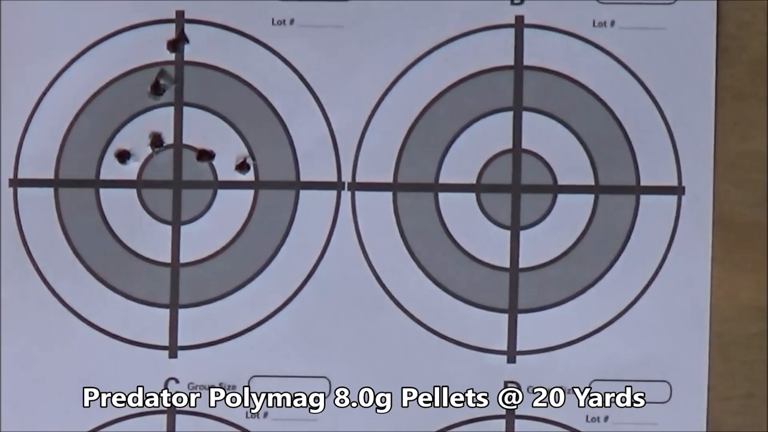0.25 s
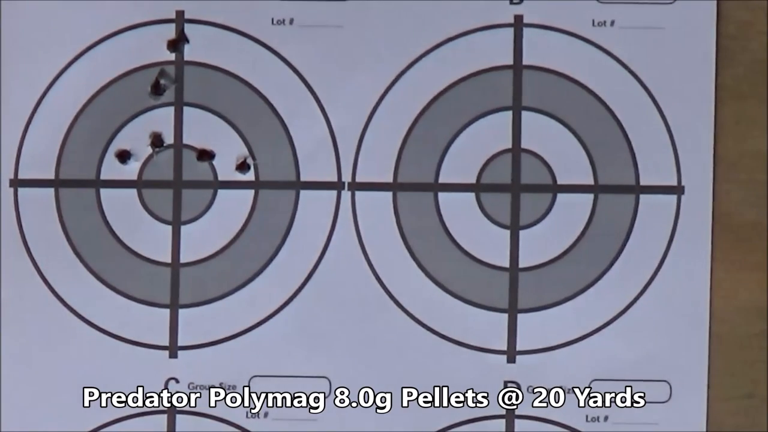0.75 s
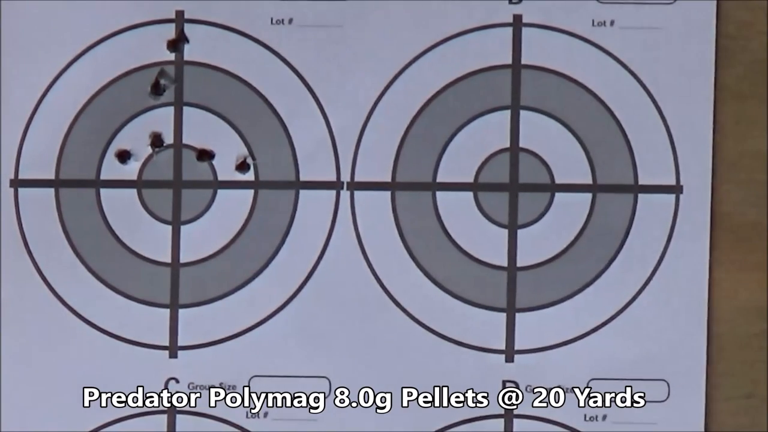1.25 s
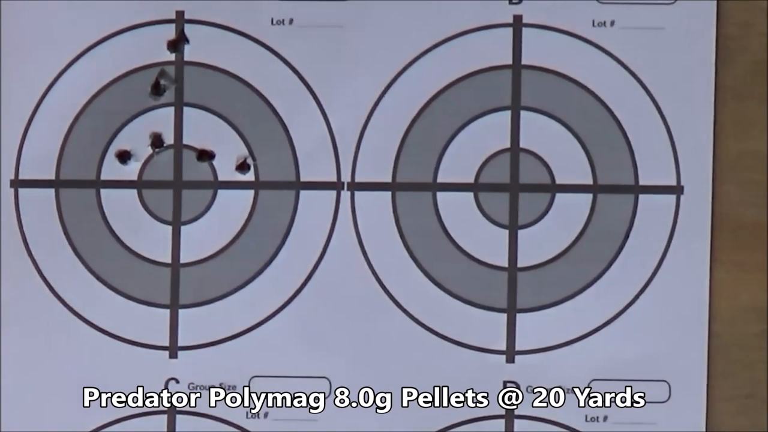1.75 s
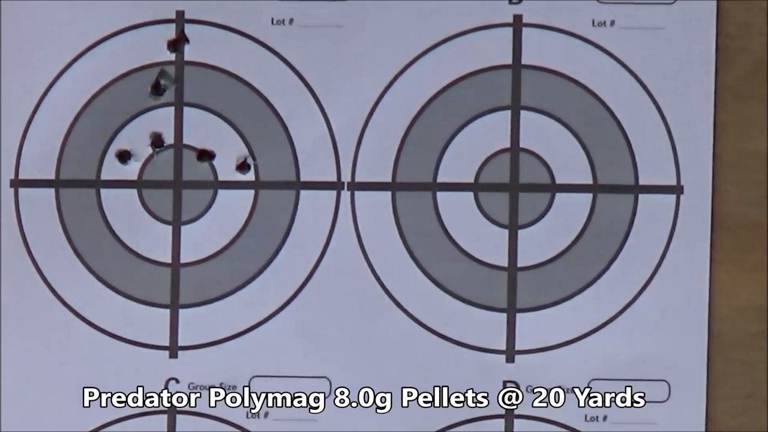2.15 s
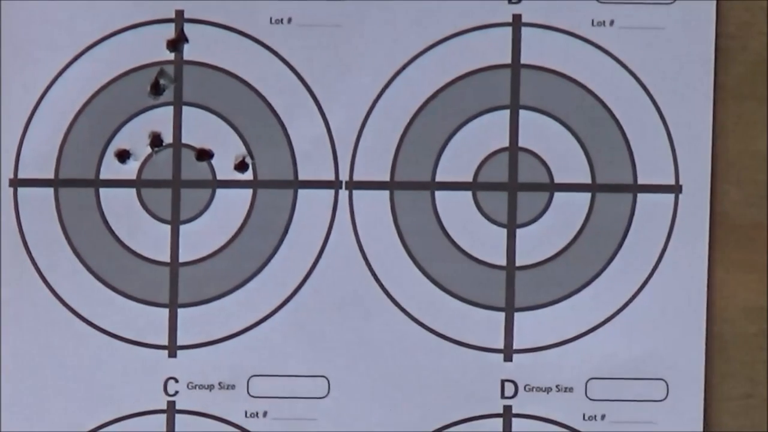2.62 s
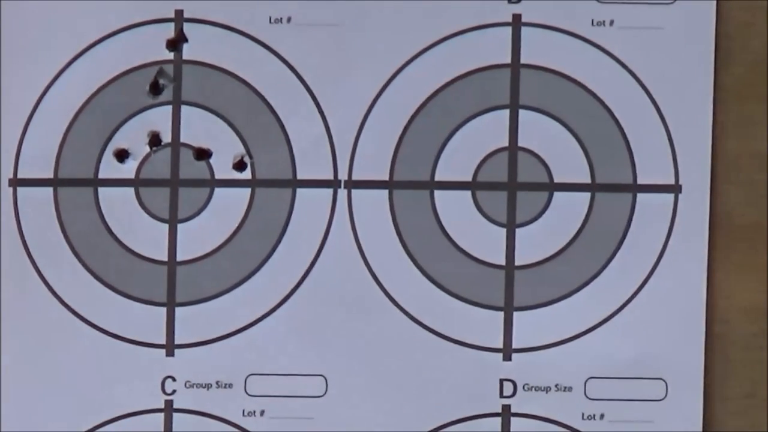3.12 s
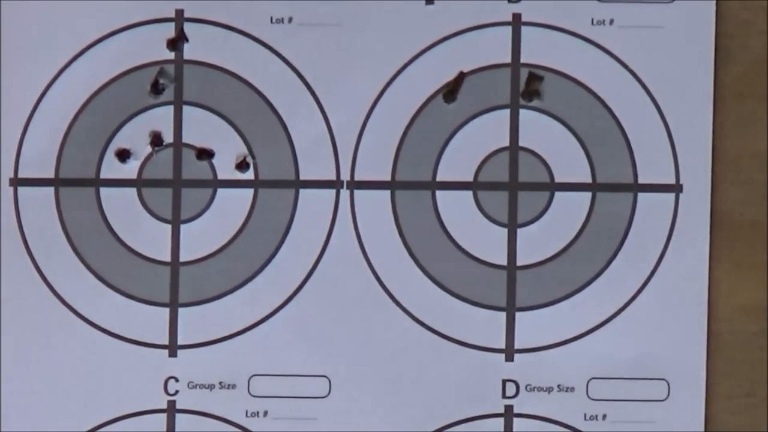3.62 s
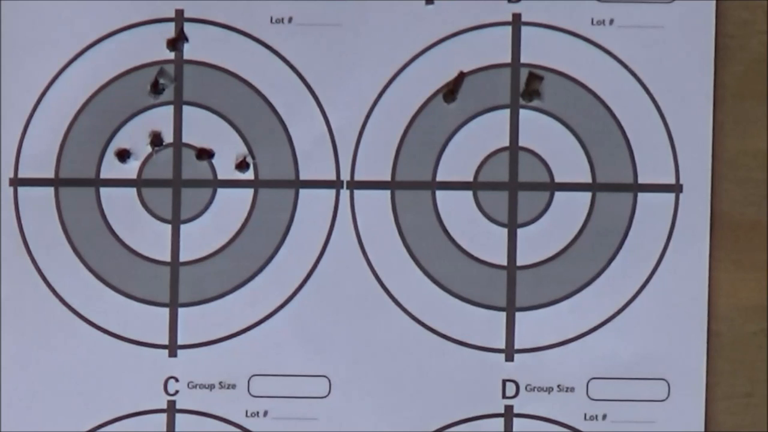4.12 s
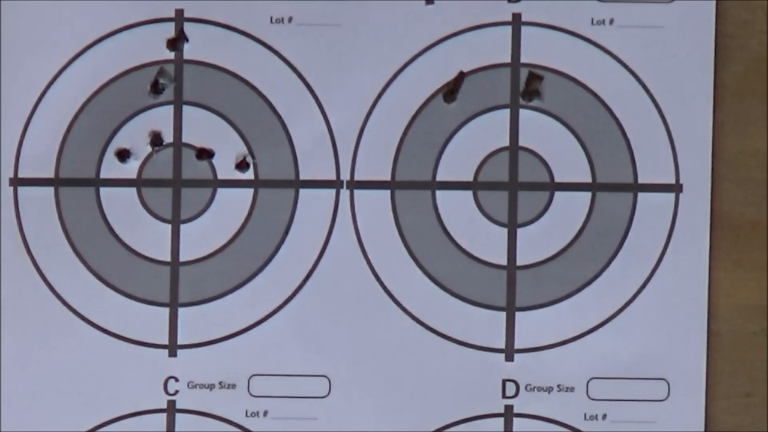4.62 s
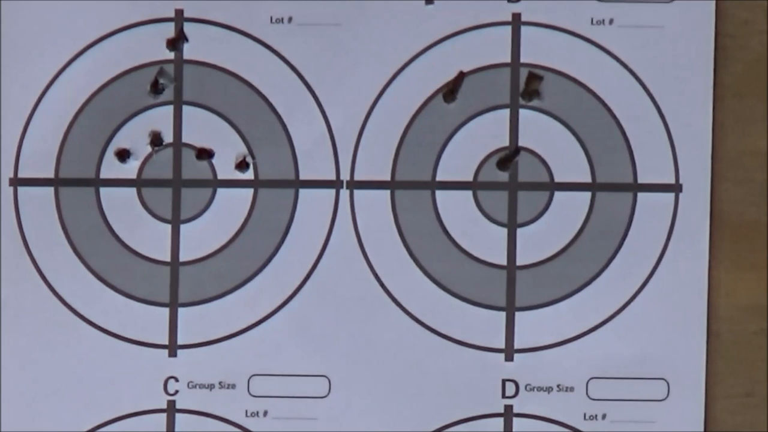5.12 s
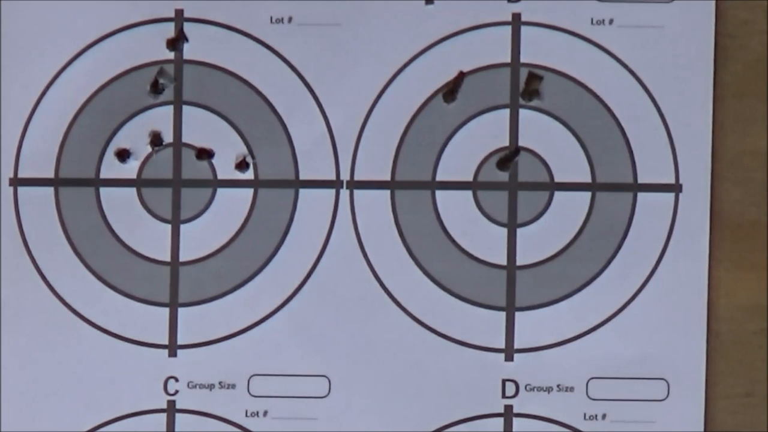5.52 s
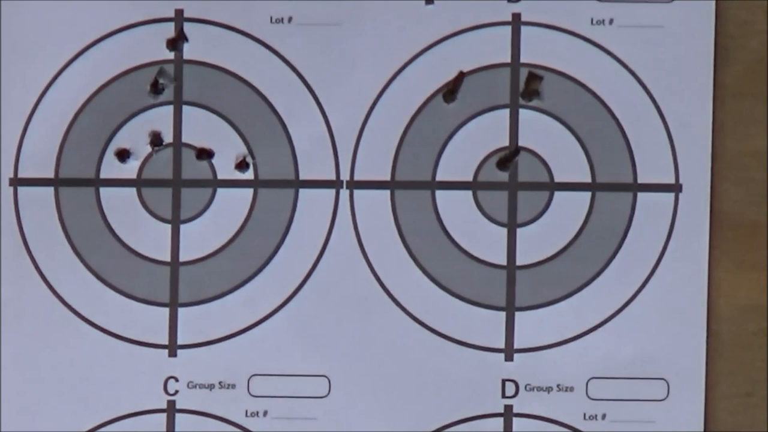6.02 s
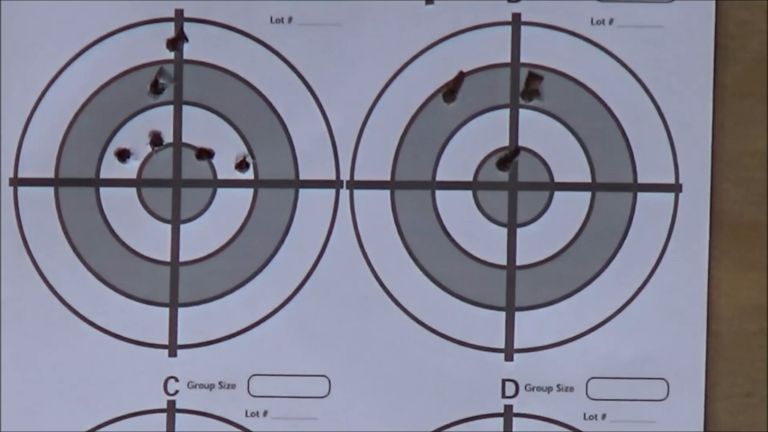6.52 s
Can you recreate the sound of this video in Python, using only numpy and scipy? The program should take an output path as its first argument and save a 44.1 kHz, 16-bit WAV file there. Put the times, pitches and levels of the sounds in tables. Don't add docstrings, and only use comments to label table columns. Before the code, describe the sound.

Gusty wind roars through trees at an outdoor range, abruptly drops to a calm hush, then a spring air rifle cracks and its pellet smacks paper.

```python
import sys
import numpy as np
from scipy import signal
from scipy.io import wavfile
from scipy.ndimage import uniform_filter1d

SR = 44100
rng = np.random.default_rng(int(sys.argv[2]) if len(sys.argv) > 2 else 0)


def nominal_scale(level):
    x = np.asarray(level, float) / 20
    return 10 ** x


def transcribe(u):
    v = np.clip(np.atleast_2d(u).T, -1, 1)
    q = np.round(v * 32767).astype(np.int16)
    wavfile.write(sys.argv[1], SR, q)


N = 298102
T = np.arange(N) / SR
CUT_S = 3.2315

# [t/s, peak level/dB, length/s, low ring f/Hz, low ring level/dB]
CRACKS = [
    (4.7694, 1, .0014, 1900, -2),
    (4.8409, -1.5, .0010, 4600, 0),
]
# [f/Hz, width/Hz, level/dB]
CAPSULE_RINGS = [(6200, 1600, -1), (7600, 1200, -6), (10100, 1800, 2), (12400, 2000, -7)]
# (start t/s, top t/s, level/dB, f/Hz, low f/Hz, low level/dB)
RATTLE = (4.7595, 4.7652, -35, 8400, 2600, -5)
# [arrival t/s, top level/dB, rise/s, fall/(dB/s)]
RETURNS = [
    (4.7695, -19.5, 0.0012, 200),
    (4.806, -24.5, 0.021, 330),
    (4.835, -28, 0.043, 67.5),
    (4.91, -39.5, 0.031, 70),
]
# [arrival t/s, top level/dB, rise/s, fall/(dB/s)]
THUMPS = [
    (4.7695, -33.5, 0.013, 400),
    (4.81, -39.5, 0.047, 78),
]
# [f/Hz, level/dB per Hz]
MUZZLE_COLOUR = [(240, -32), (400, -3), (654, -8), (739, -19), (1050, -8), (1150, -17), (1640, -4),
                 (3820, -11), (5200, -8), (5880, -5), (8630, -8.5), (9750, -1), (10700, -8.5), (12900, -11),
                 (15700, -25)]
# [f/Hz, level/dB per Hz]
STRIKE_COLOUR = [(530, -35), (900, 7), (1190, -17), (1320, 0), (1520, -7.5), (2340, -5), (3120, -5),
                 (5820, 2), (8330, -2), (9390, 2.5), (15700, -18)]
# [f/Hz, level/dB per Hz]
FAR_COLOUR = [(410, -45), (700, -9), (808, -6), (1020, -6), (1290, -2), (1860, 1), (2200, -8.5), (3560, -4),
              (5620, -0.5), (9960, -6.5), (14500, -22), (15700, -30)]
# [f/Hz, level/dB per Hz]
THUMP_COLOUR = [(88, -49), (150, -28), (220, 7), (465, 0), (507, -14), (588, -11), (731, -6), (1200, -18.5),
                (1560, -44), (2640, -120)]
# [f/Hz, likeness 0..1]
ECHO_LIKENESS = [(150, .98), (380, 0.96), (950, 0.52), (2380, .35), (5980, 0.59), (9500, 0.87),
                 (11500, 0.94)]
# [t/s, peak level/dB, f/Hz, ring time to -60 dB/s, left-right level/dB]
SLAPS = [(4.780, -21, 1700, .012, 0), (4.792, -19, 9700, .012, 0), (4.807, -26, 300, .06, 0),
         (4.8185, -19, 6050, .05, 0), (4.8258, -18, 6000, .02, 0), (4.8895, -23, 760, .014, 0),
         (4.888, -29, 330, .05, 0), (4.943, -28, 4200, .012, 0), (4.951, -25, 4200, .012, 0),
         (4.961, -33, 1600, .015, 0), (5.026, -34, 3000, .008, 6), (5.068, -29, 3100, .006, -5),
         (5.0683, -30, 9500, .004, -3), (5.0683, -33, 6000, .003, -3), (5.0997, -19, 3200, .004, 8),
         (5.1008, -27, 1750, .01, 6), (5.109, -34, 7800, .006, 0), (5.122, -35, 3100, .006, 2),
         (5.153, -39, 1900, .01, -6), (5.165, -40, 2100, .008, -3), (5.1789, -25.5, 2800, .005, 5),
         (5.1793, -32, 1900, .007, 3)]
# [t/s, length/s, level/dB, lower f/Hz, upper f/Hz]
CAWS = [
    (3.473, .11, -57, 1250, 1360),
    (4.249, 0.15, -59, 1250, 1420),
]
# (start t/s, rise/s, hold/s, fade/s, level/dB)
ENGINE = (4.18, .12, .5, .1, -49.5)
# [t/s, gust level/dB]
GUSTS = [(0, -2.5), (.3, -3), (.9, -1), (1.4, 1.5), (1.75, 3), (2.1, 0), (2.35, 1.5), (2.6, -0.5),
         (3.07, 0.5), (3.23, -1), (3.24, 2), (3.45, -1), (3.7, 1), (3.95, -2.5), (4.25, 1), (4.8, 0),
         (6.5, 0), (6.76, 2.5)]
# (rumble level/dB, roar level/dB, rustle level/dB)
GUSTY_LEVELS = (-44.5, -39, -37)
# (rumble level/dB, roar level/dB, rustle level/dB)
CALM_LEVELS = (-50.5, -52, -56.5)
# (rumble, roar, rustle) [dB per dB]
GUST_SHARES = (1.13, .35, 0.3)
# [f/Hz, level/dB per Hz]
GUSTY_LOW = [(12, -44), (20, -49), (80, 0), (102, 1.5), (288, -4), (361, -0.5), (433, -4.5), (499, -2.5),
             (736, -3), (2600, -8), (3380, -42), (5720, -120)]
# [f/Hz, level/dB per Hz]
GUSTY_HIGH = [(710, -30), (1200, -0.5), (1460, -2), (1730, -1.5), (2470, -5), (3410, -4.5), (5410, -3.5),
              (8410, -8), (9780, -6.5), (14400, -21), (15700, -30)]
# [f/Hz, level/dB per Hz]
CALM_LOW = [(12, -58), (20, -28), (42, -24.5), (96, 2), (192, -10), (288, -15.5), (383, -19.5), (553, -20),
            (600, -20), (1040, -21), (1170, -25), (2600, -26.5), (3380, -64), (5720, -120)]
# [f/Hz, level/dB per Hz]
CALM_HIGH = [(710, -31), (1200, 2.5), (1430, -3.5), (1600, -7.5), (1730, -4.5), (1890, -10), (3300, -9.5),
             (3710, -11.5), (4560, -9), (8230, -15.5), (9670, -15.5), (15700, -29.5)]
# [f/Hz, likeness 0..1]
WIND_LIKENESS = [(60, .995), (150, .992), (380, .94), (950, .76), (2380, .62), (5980, .67), (9000, .8),
                 (10300, .9), (11600, .999)]
# [f/Hz, left-right level/dB]
LEAN = [(200, 0), (600, -.9), (1500, -.9), (3000, 0), (5500, .6), (11000, 0)]
# [t/s, depth/dB, recovery/s]
DUCKS = [
    (4.7665, 15, .011),
    (4.8383, 14, .009),
    (4.87, 7, 4.0),
]


def evened(x):
    return x / np.sqrt(np.mean(x ** 2) + 1e-20)


def read(points, hz):
    f, value = np.transpose(points)
    return np.interp(np.log(hz + 1), np.log(f + 1), value)


def add(mix, s, sound):
    part = mix[..., round(s * SR):][..., :sound.shape[-1]]
    part += sound[..., :part.shape[-1]]


def resonate(x, hz, width_hz):
    turn = np.exp(2j * np.pi * np.cumsum(hz * np.ones(x.shape[-1])) / SR)
    r = np.exp(-np.pi * width_hz / SR)
    return 2 * (turn * signal.lfilter([1 - r], [1, -r], x / turn)).real


def noise(count, size, colour_db, likeness, patchy_db, flicker_db, lead=-0.23):
    frames = 4 * count // size + 6
    hz = np.fft.rfftfreq(size, 1 / SR)[:, None]
    a, b, c, d, patches = rng.standard_normal((frames, len(hz), 5)).T
    patches = uniform_filter1d(patches, size=size // 80 + 1, axis=0)
    patches = evened(uniform_filter1d(patches, size=12, axis=1))
    flicker = evened(uniform_filter1d(rng.standard_normal(frames), size=5))
    same = np.clip(read(likeness, hz), -1, 1)
    different = np.sqrt(1 - same ** 2)
    left = a + 1j * b
    right = same * left + different * (c + 1j * d)
    z = np.array([left * np.exp(1j * lead * different), right])
    z *= nominal_scale(np.array([.5, -.5])[:, None, None] * read(LEAN, hz))
    frame_s = np.arange(frames) * size / 4 / SR
    z *= nominal_scale(colour_db(hz, frame_s) + patchy_db * patches + flicker_db * flicker)
    return evened(signal.istft(z, nperseg=size, noverlap=3 * size // 4)[1][:, :count])


def crack(s, db, length, low_hz, low_db):
    spikes = np.zeros((2, 400))
    count = round(length * SR)
    places = [0, round(length * SR * .3), round(length * SR * .45), round(length * SR * .8)]
    spikes[:, places] = [1.0, -1.6, 0.91, -0.26]
    spikes[:, :count] += 0.18 * rng.standard_normal((2, 200))[:, :count]
    rings = CAPSULE_RINGS + [(low_hz, 1500, low_db)]
    ring = sum(nominal_scale(d) * resonate(resonate(spikes, f, w), f, w) for f, w, d in rings)
    return s, nominal_scale(db) * ring / abs(ring).max()


def rattle(start, top, db, hz, low_hz, low_db):
    t = np.arange(start, top + .0045, 1 / SR)
    scrape = rng.standard_normal((2, 600))[:, :len(t)]
    scrape = scrape[0] + .5 * scrape
    bright = evened(resonate(resonate(scrape, hz, 2600), hz, 2600))
    low = evened(resonate(scrape, low_hz, 2500))
    to_go = np.clip((top - t) / (top - start), 0, 1)
    return start, nominal_scale(db - 26 * to_go ** 1.5) * (bright + nominal_scale(low_db) * low)


def fronts(rows, t):
    power = 0
    for s, db, rise, fall in rows:
        swell = np.clip((t - s) / rise + 1e-3, 0, 1)
        power = power + swell ** 2 * nominal_scale(2 * db - 2 * fall * np.maximum(t - s - rise, 0))
    return np.sqrt(power)


def echoes():
    start, strike_s = CRACKS[0][0], CRACKS[1][0]
    t = start + np.arange(round(.75 * SR)) / SR

    def colour(hz, at):
        s = at + start
        struck = np.clip((s - strike_s) / 0.0056 + .5, 0, 1)
        far = np.clip((s - 4.89) / (4.97 - 4.89), 0, 1)
        air_db = 58 * (hz / 1e4) ** 2 * np.maximum(s - 5, 0)
        muzzle_part = (1 - struck) * read(MUZZLE_COLOUR, hz)
        strike_part = (struck - far) * read(STRIKE_COLOUR, hz)
        return muzzle_part + strike_part + far * read(FAR_COLOUR, hz) - air_db

    wash = noise(len(t), 256, colour, ECHO_LIKENESS, 1.3, .9, lead=-.25)
    wash /= np.sqrt(uniform_filter1d((wash ** 2).mean(0), size=900))
    thump = noise(len(t), 1024, lambda hz, _: read(THUMP_COLOUR, hz), ECHO_LIKENESS, 0.99, 0.57)
    return start, fronts(RETURNS, t) * wash + fronts(THUMPS, t) * thump


def slap(s, db, hz, t60, pan_db):
    t = np.arange(round(t60 * SR)) / SR
    rough = resonate(resonate(rng.standard_normal(SR // 5), hz, .2 * hz), hz, .2 * hz)
    ring = np.sin(2 * np.pi * hz * t) + .35 * evened(rough)[:len(t)]
    shape = nominal_scale(db - 60 * t / t60) * np.minimum(t / (.08 * t60), 1)
    return s, shape * ring * nominal_scale([[pan_db / 2], [-pan_db / 2]])


def caw(s, length, db, *throat_hz):
    t = np.arange(int(.5 * SR)) / SR
    rasp = rng.standard_normal((2, len(t)))
    rasp = rasp[0] + .8 * rasp
    bend = 1 + 0.034 * np.sin(np.pi * np.minimum(t / length, 1.5))
    tone = sum(resonate(resonate(rasp, f * bend, 170), f, 260) for f in throat_hz)
    shape = np.minimum(t / 0.022, 1) * nominal_scale(-150 * np.maximum(t - length, 0))
    return s, nominal_scale(db) * evened(tone) * shape


def drone():
    start, rise, hold, fade, db = ENGINE
    idle_hz, climb_hz, climb_db = 158, 8, -2.5
    t = np.arange(0, rise + hold + fade, 1 / SR)
    rev = np.clip((t - rise) / hold, 0, 1) ** 2
    fade_db = 20 * np.maximum(1 - t / rise, 0) + 20 * np.maximum(t - rise - hold, 0) / fade
    waver = evened(uniform_filter1d(rng.standard_normal(len(t)), size=4000))
    phase = 2 * np.pi * np.cumsum(idle_hz + climb_hz * rev + 0.47 * waver) / SR
    return start, nominal_scale(db + climb_db * rev - fade_db + 1.1 * waver) * np.sqrt(2) * np.sin(phase)


def over(hz, edge_hz):
    return -10 * np.log10(1 + (edge_hz / (hz + 1)) ** 6)


def under(hz, edge_hz):
    return -10 * np.log10(1 + (hz / edge_hz) ** 6)


def wind(levels_db, low, high, t0, t1):
    t = T[round(t0 * SR):round(t1 * SR)]
    gust_db = np.interp(t, *np.transpose(GUSTS))

    def rumble_colour(hz, _):
        return read(low, hz) + under(hz, 223)

    def roar_colour(hz, _):
        return read(low, hz) + over(hz, 216) + under(hz, 1450)

    def rustle_colour(hz, _):
        return read(high, hz) + over(hz, 1660)

    rumble = noise(len(t), 1024, rumble_colour, WIND_LIKENESS, 0.72, 0.55)
    roar = noise(len(t), 1024, roar_colour, WIND_LIKENESS, 0.84, 0.33)
    rustle = noise(len(t), 1024, rustle_colour, WIND_LIKENESS, 0.44, 0.19)
    layers = zip(levels_db, GUST_SHARES, [rumble, roar, rustle])
    return sum(nominal_scale(db + share * gust_db) * layer for db, share, layer in layers)


def scene():
    mix = np.zeros((2, N))
    add(mix, 0, wind(GUSTY_LEVELS, GUSTY_LOW, GUSTY_HIGH, 0, CUT_S))
    add(mix, CUT_S, wind(CALM_LEVELS, CALM_LOW, CALM_HIGH, CUT_S, N / SR))
    sounds = [crack(*row) for row in CRACKS] + [rattle(*RATTLE), echoes()]
    sounds += [slap(*row) for row in SLAPS] + [caw(*row) for row in CAWS] + [drone()]
    for sound in sounds:
        add(mix, *sound)
    return mix


def low_pass(x):
    return signal.sosfilt(signal.butter(12, 16510, fs=SR, output="sos"), x)


def record(dry):
    duck_db = 0
    for s, depth_db, recovery in DUCKS:
        attack = .0008 if recovery < 1 else .09
        since = T - s
        release = np.exp(-(np.maximum(since, 0) / recovery) ** 1.24)
        duck_db = duck_db + depth_db * np.clip(since / attack, 0, 1) * release
    band_limit = signal.firwin(255, 15720, fs=SR)[None]
    finished = signal.oaconvolve(dry * nominal_scale(-duck_db), band_limit, "same")
    return low_pass(finished)


dry = scene()
out = record(dry)
transcribe(out)
```